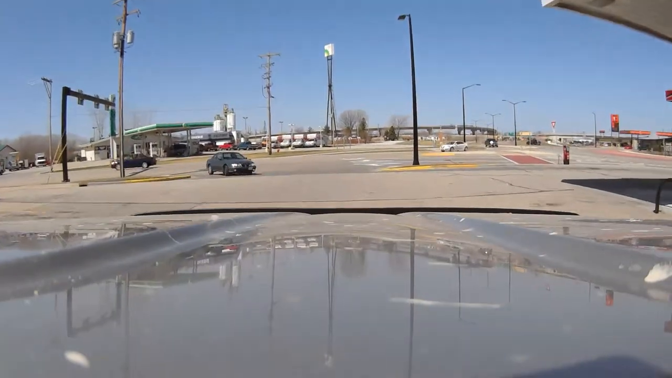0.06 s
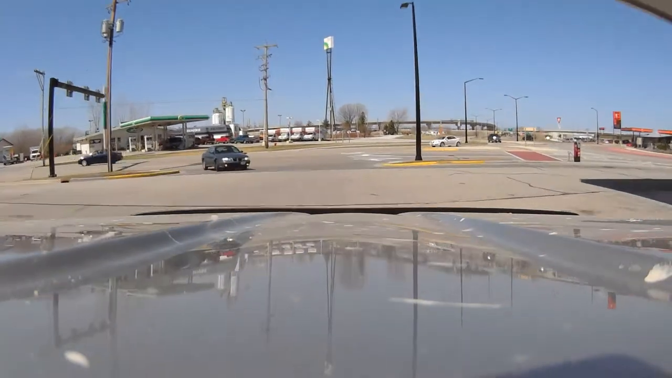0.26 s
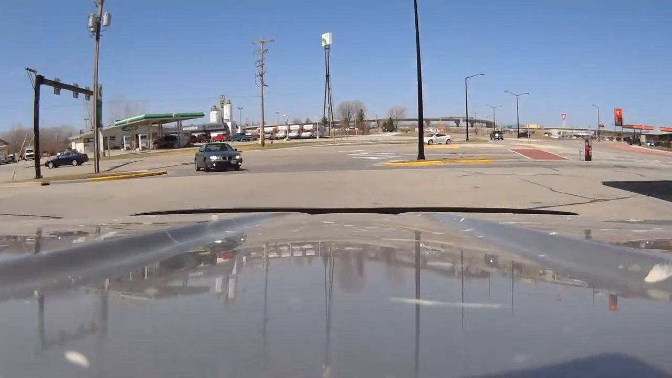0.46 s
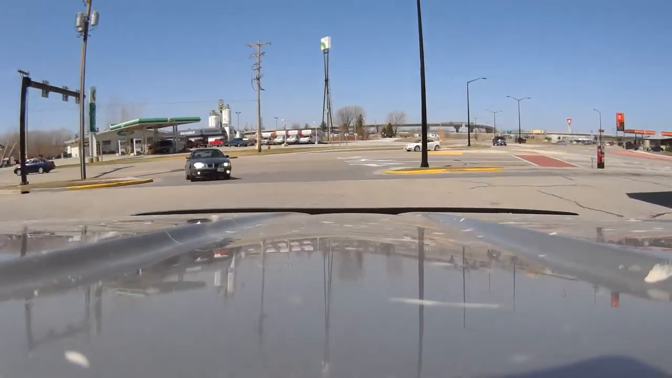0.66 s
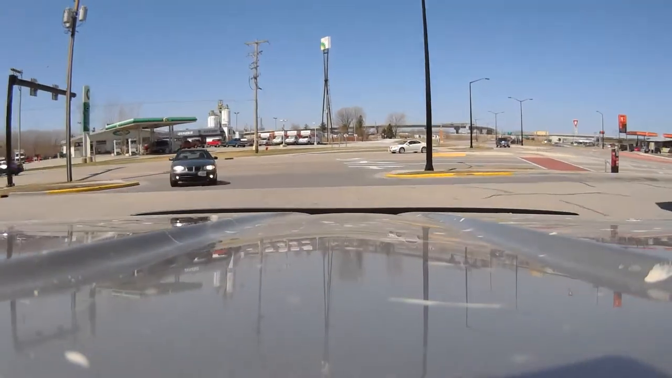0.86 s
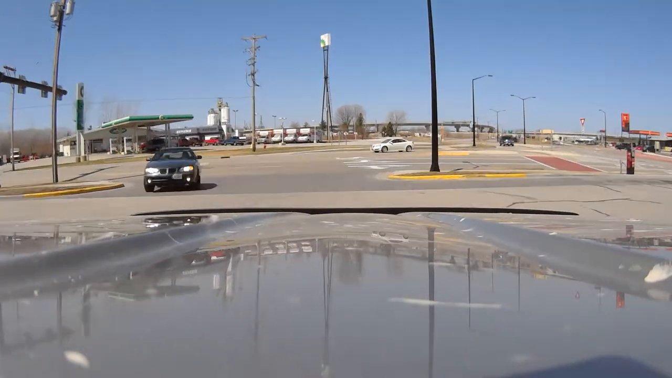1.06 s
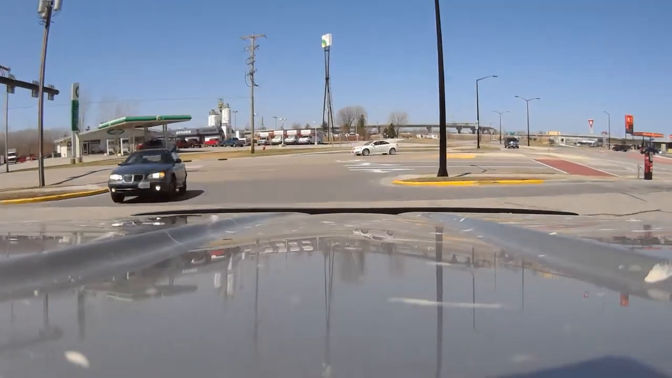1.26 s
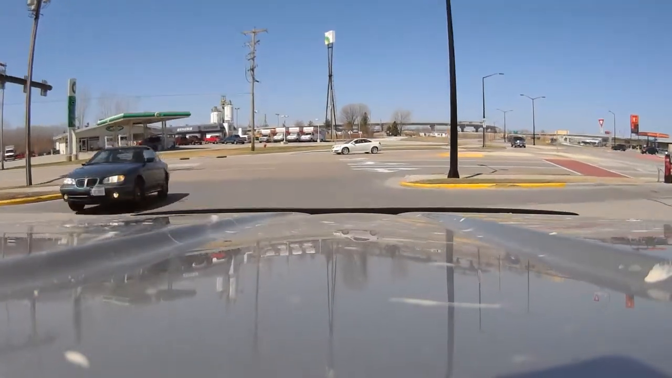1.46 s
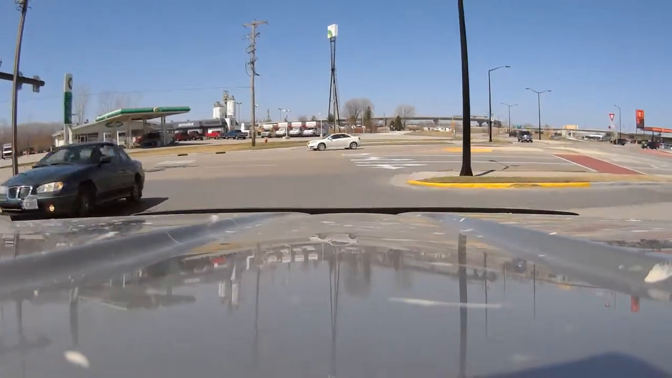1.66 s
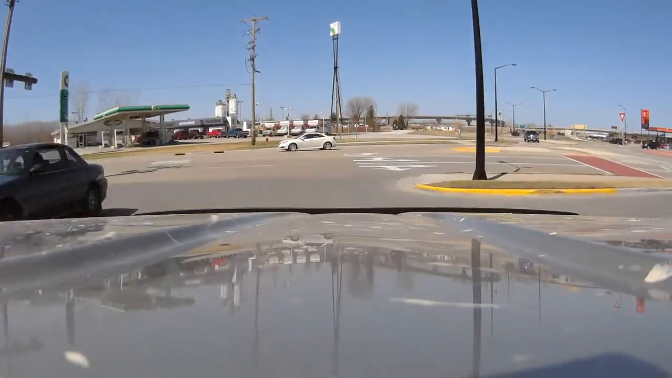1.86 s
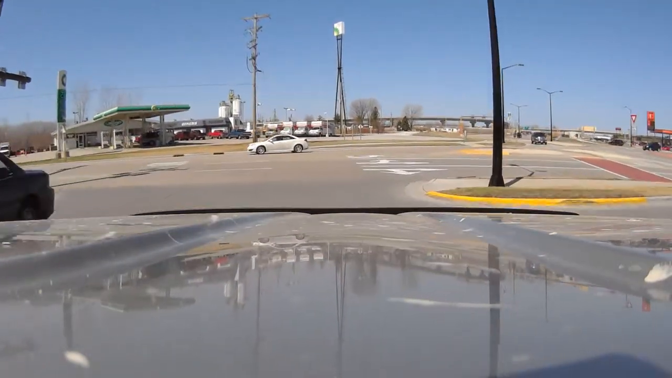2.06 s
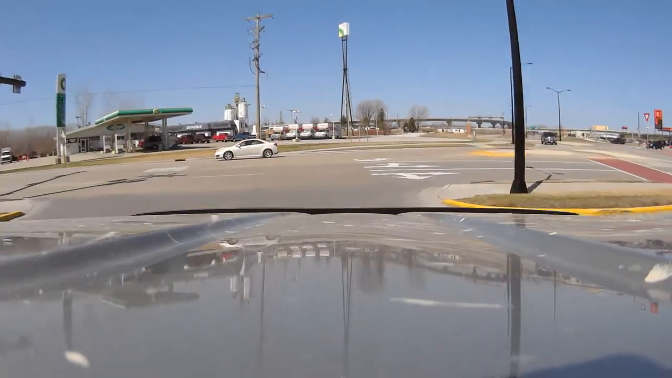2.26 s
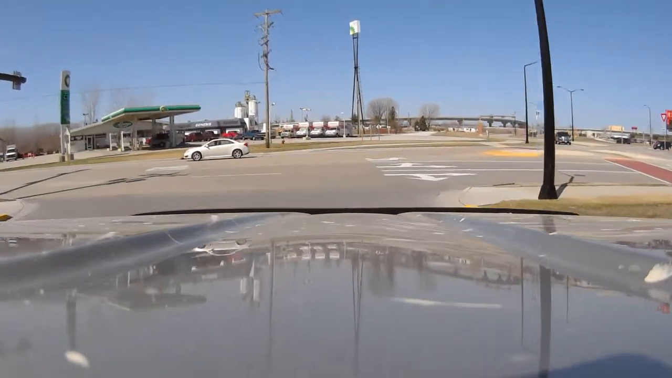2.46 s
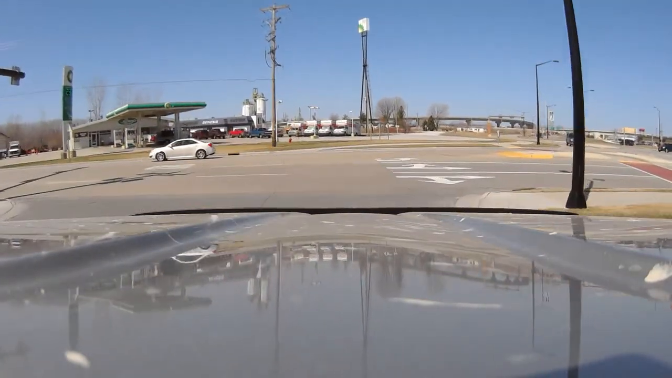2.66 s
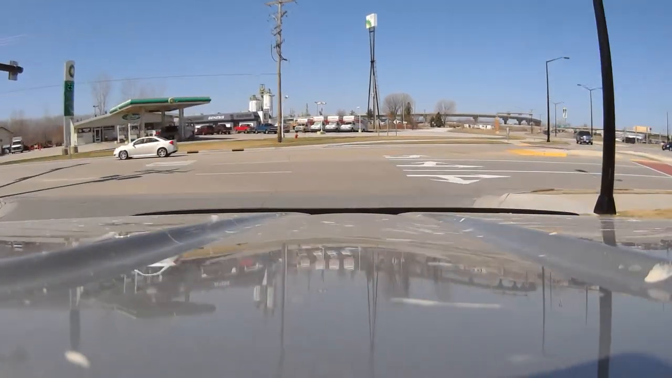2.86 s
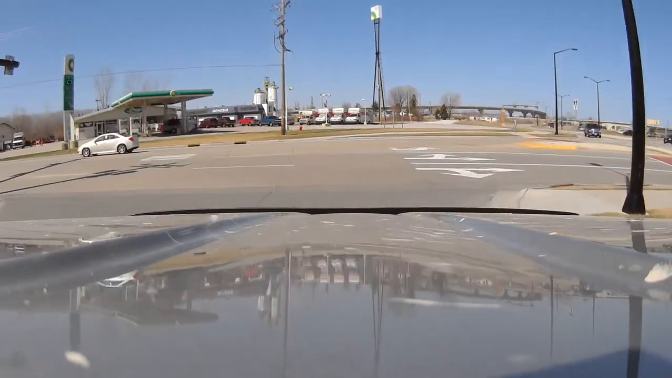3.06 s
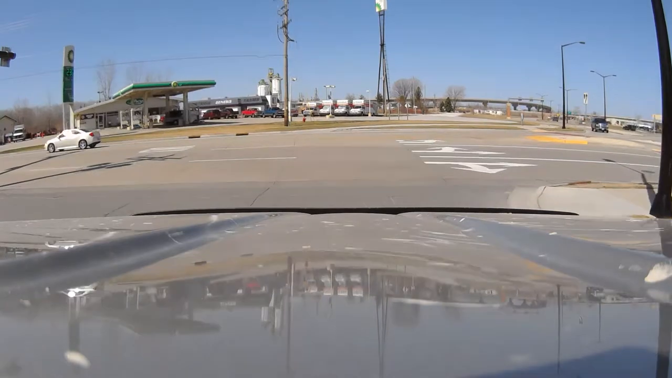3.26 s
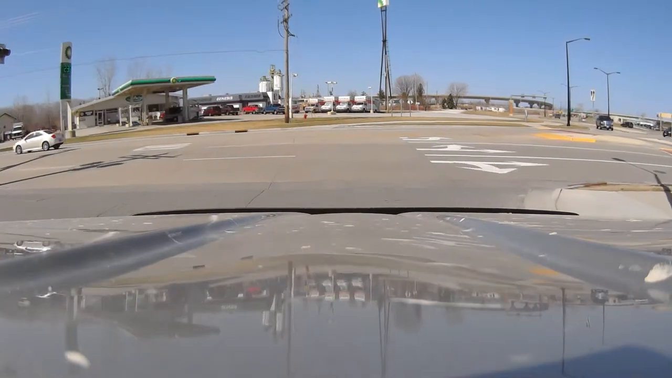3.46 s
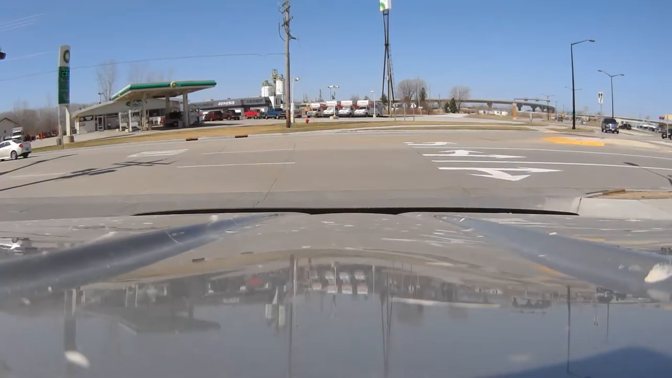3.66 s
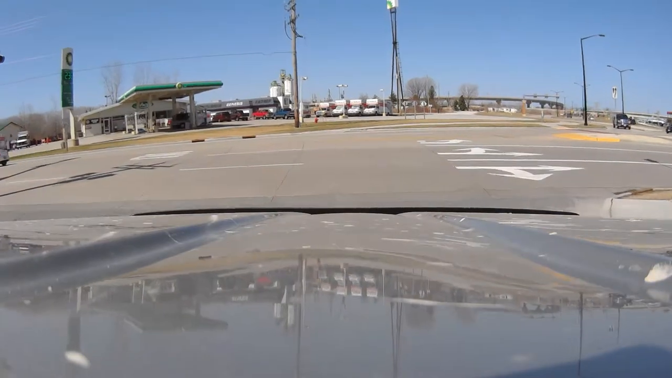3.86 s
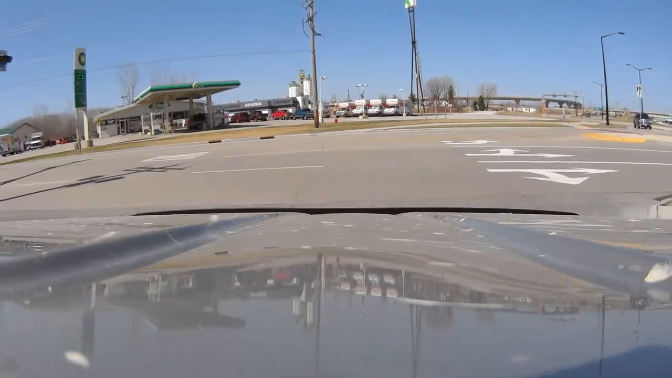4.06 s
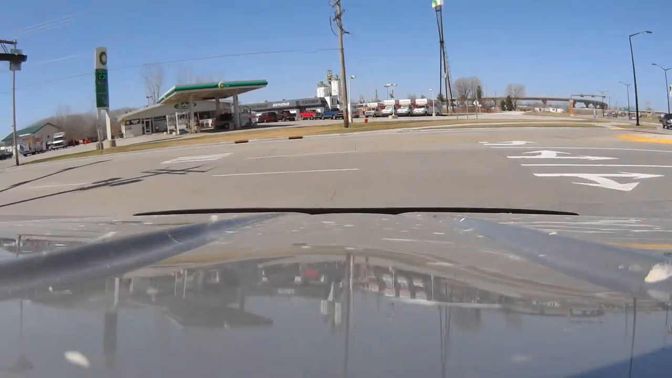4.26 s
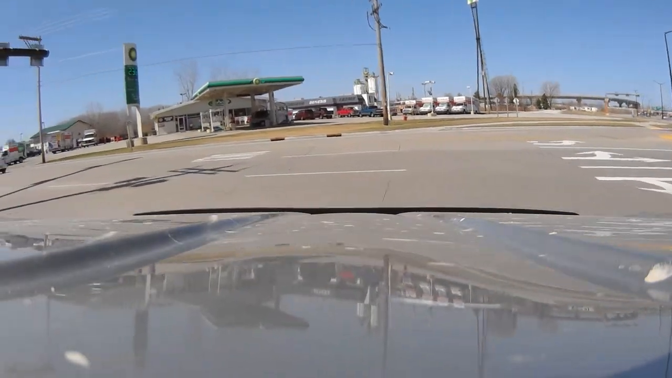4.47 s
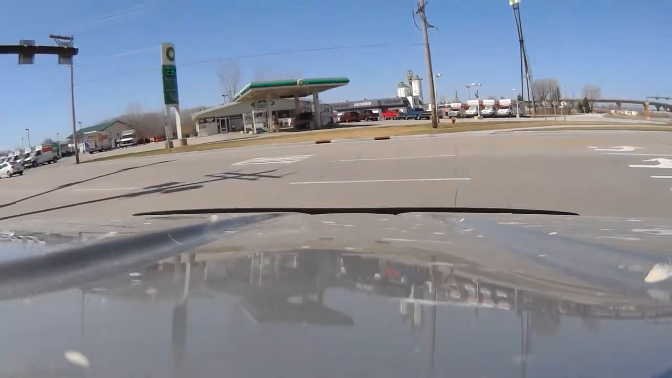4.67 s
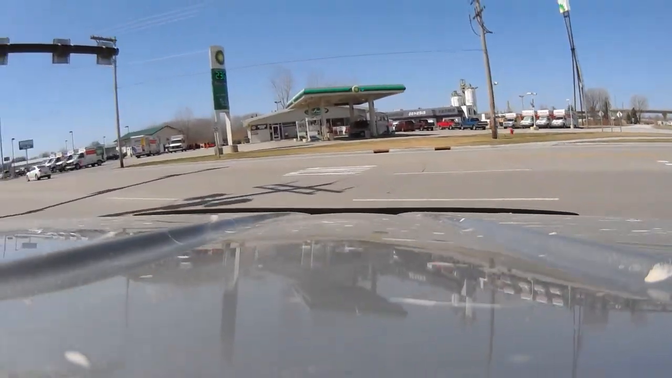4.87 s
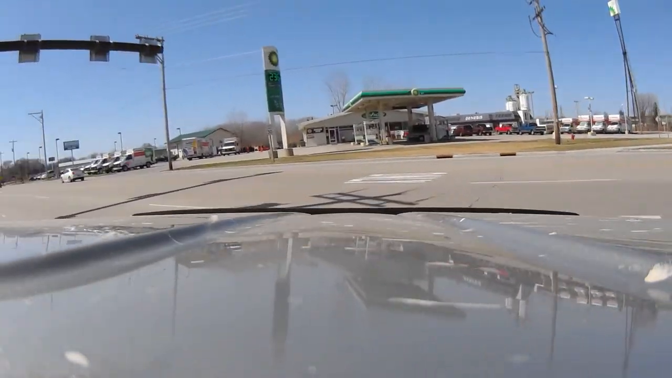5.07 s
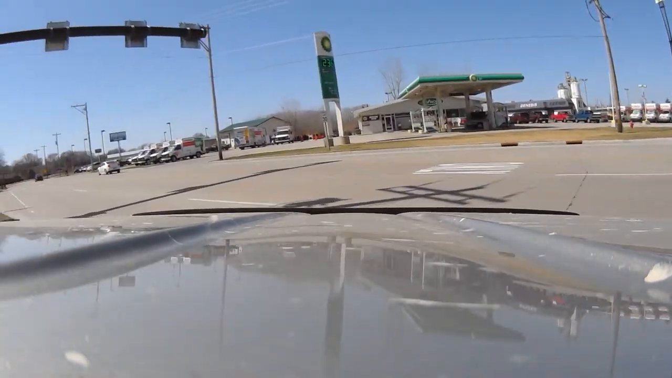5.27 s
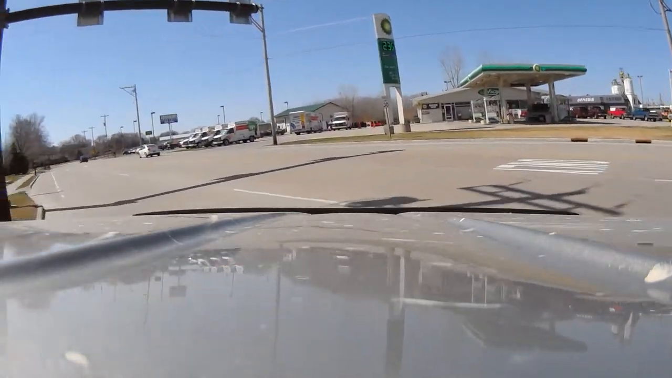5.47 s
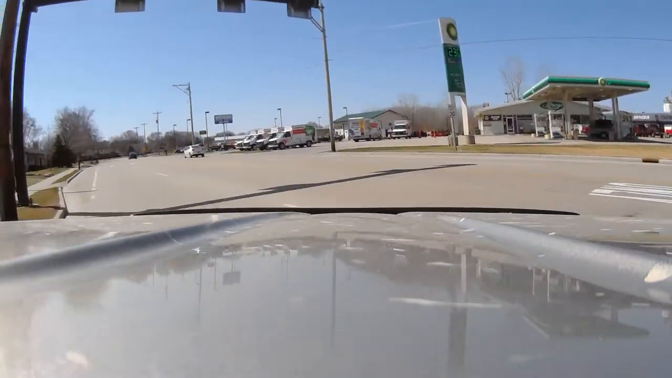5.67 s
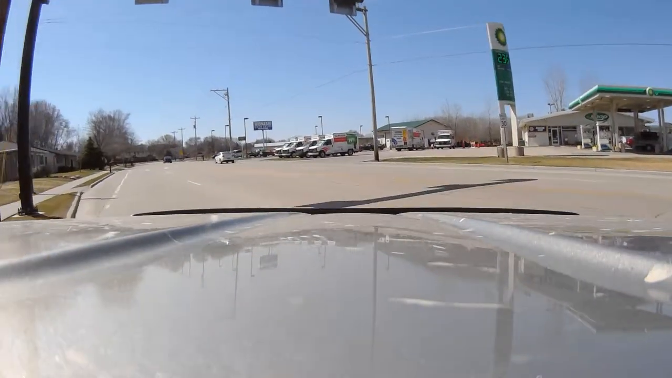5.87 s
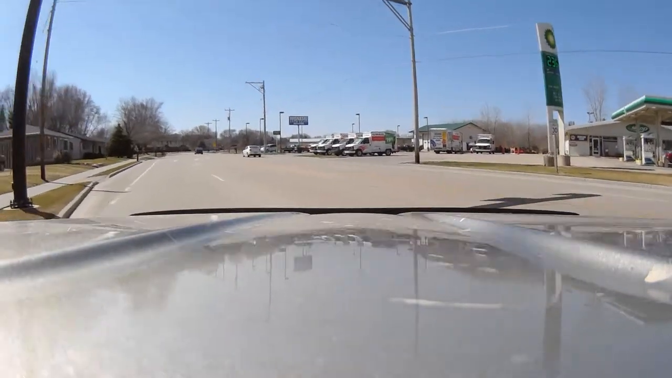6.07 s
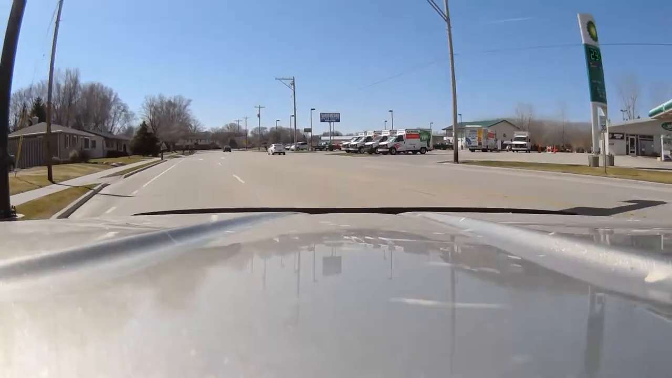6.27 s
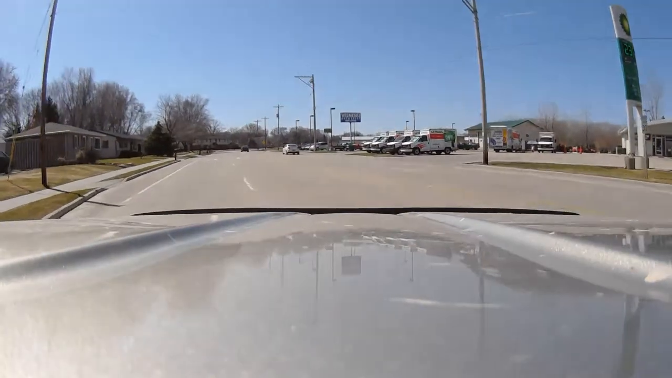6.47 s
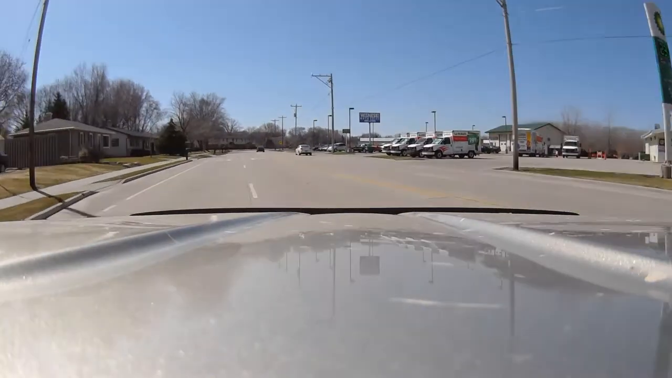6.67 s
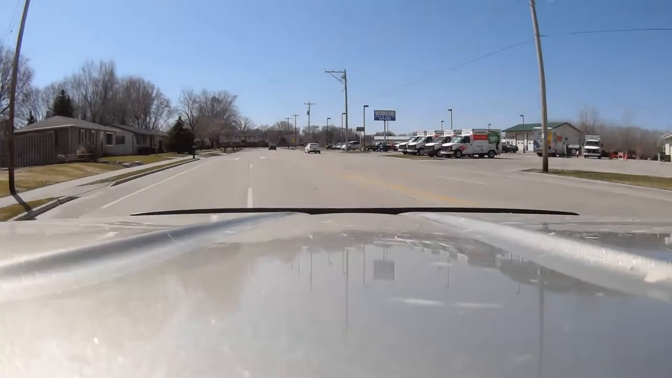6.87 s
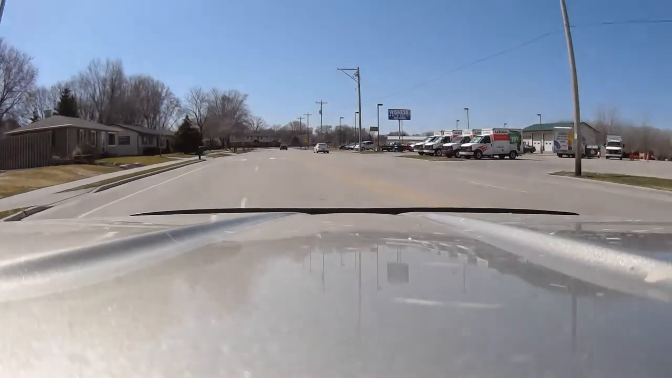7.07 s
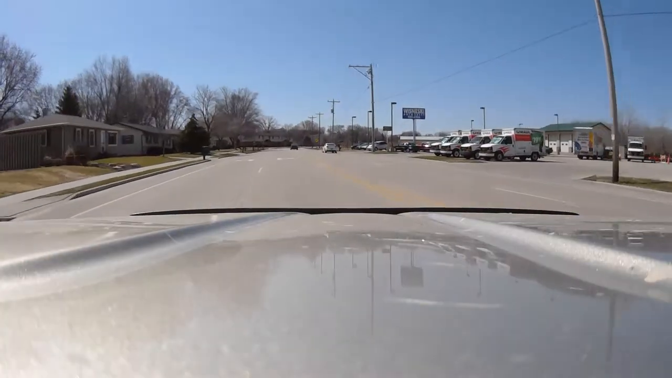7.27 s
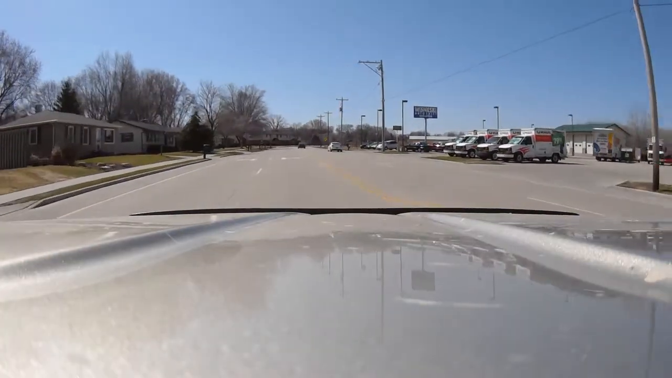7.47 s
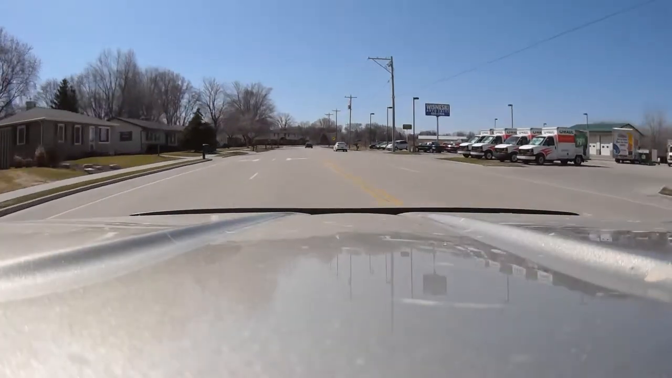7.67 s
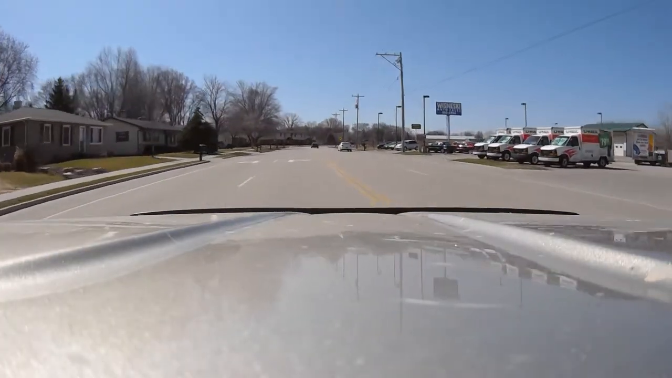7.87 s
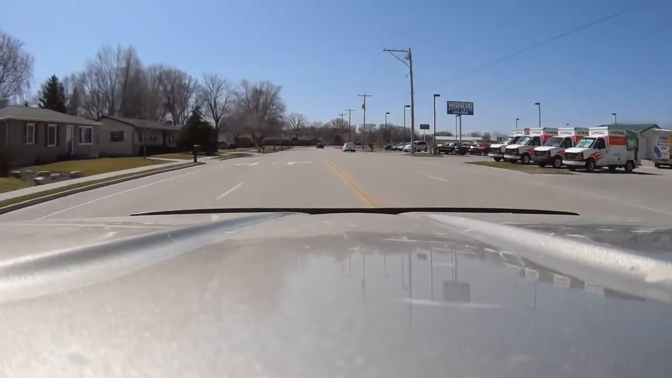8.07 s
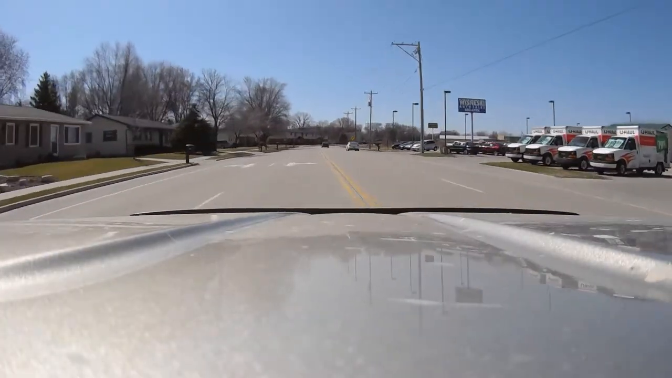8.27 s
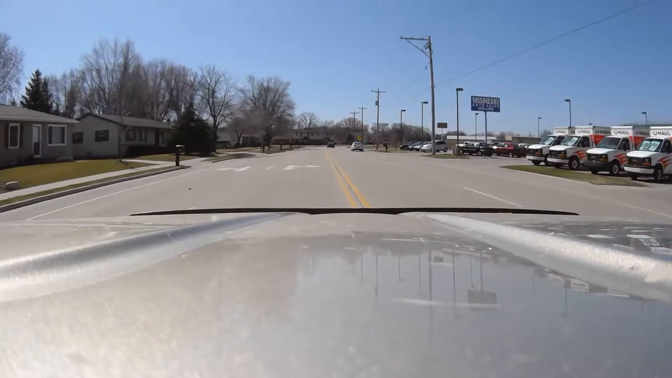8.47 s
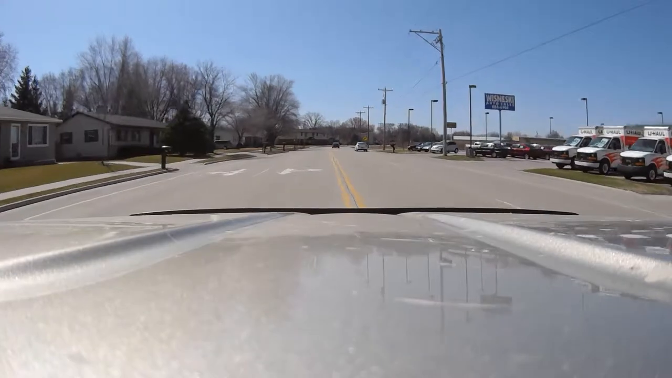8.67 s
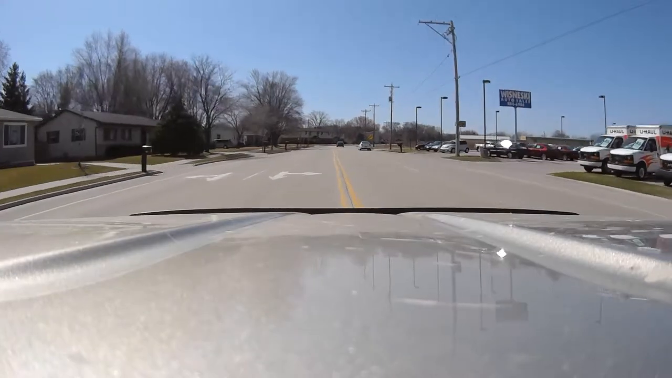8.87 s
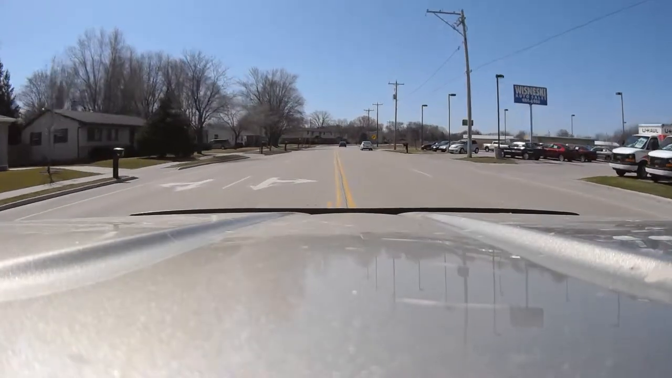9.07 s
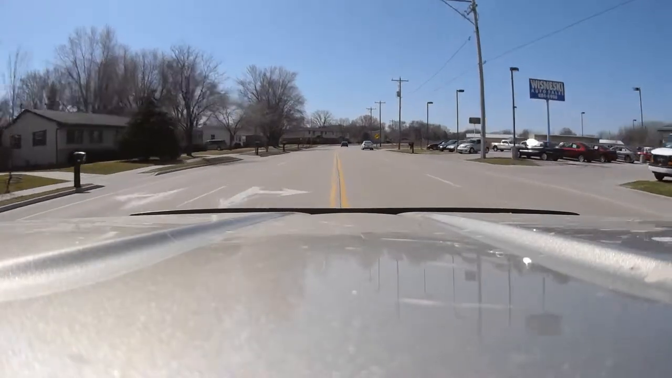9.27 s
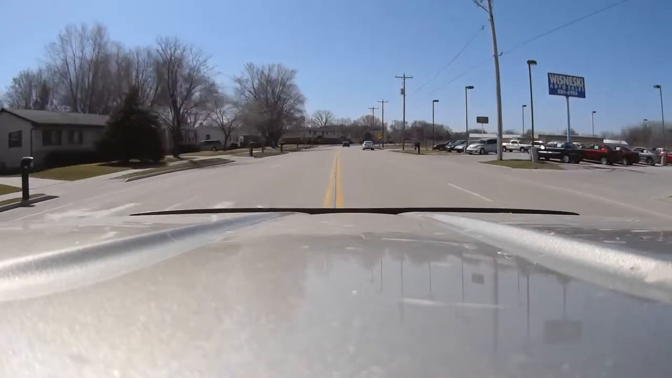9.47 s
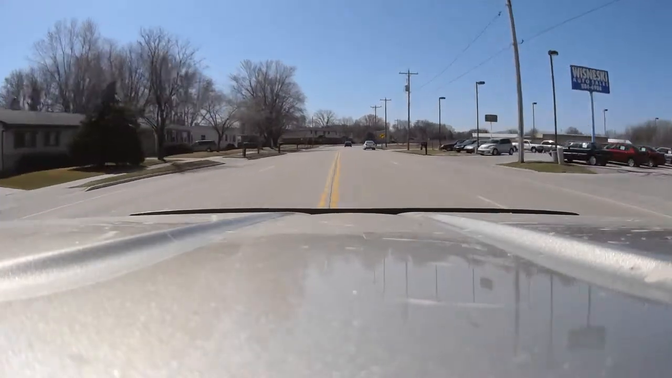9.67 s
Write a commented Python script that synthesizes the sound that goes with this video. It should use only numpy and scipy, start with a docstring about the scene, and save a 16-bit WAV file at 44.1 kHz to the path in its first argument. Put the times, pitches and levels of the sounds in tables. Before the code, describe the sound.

A car engine gives a brief blip and sinks toward idle as the car rolls slowly, with a few dull knocks from the pavement. Then the throttle opens and a booming engine note climbs steadily along the street, joined by low tyre roar. Wind grows on the bonnet-mounted microphone until its rumbling, thumping and crackling gusts dominate and briefly distort.

```python
"""A six-cylinder car, heard from its bonnet, coasts out of a forecourt and then pulls away hard.
Firing pulses sweep the exhaust resonances, booming as the throttle opens and the note climbs.
Tyres roar, the pavement knocks, an alternator whines and the intake whistles briefly.
With speed, wind buffets the microphone, tears into crackle and overloads the recorder."""
import sys
import numpy as np
from scipy import signal
from scipy.fft import rfft, irfft, next_fast_len
from scipy.io import wavfile
from scipy.ndimage import uniform_filter1d, map_coordinates

SR = 44100
rng = np.random.default_rng(int(sys.argv[2]) if len(sys.argv) > 2 else 0)


def output_pcm(signal):
    """Save a mono or channel-first signal as 16-bit PCM at the path in sys.argv[1].

    Samples are clipped to [-1, 1] before scaling.
    """
    pcm = np.clip(np.atleast_2d(signal).T, -1, 1) * 32767
    wavfile.write(sys.argv[1], SR, np.round(pcm).astype(np.int16))


N = 428211
T = np.arange(N) / SR

# midrange crackle of air tearing off the microphone: freq_hz, gain_db
CRACKLE_EQ = [(100, -27), (350, -16), (700, 5), (1400, -4), (2500, -17.5), (4500, -36.5), (8000, -34.5)]
# bright snap of the hardest tears: freq_hz, gain_db
SNAP_EQ = [(200, -18), (1200, 1), (3000, -4.5), (5000, -9), (8000, -20.5)]


def amp(db):
    """Decibels to gain."""
    return 10 ** (np.asarray(db) / 20)


def unit(x):
    """Scale to rms 1."""
    return x / np.sqrt(np.mean(x ** 2) + 1e-20)


def along(eq, hz):
    """Gain in dB of an EQ curve at hz, on a log frequency axis."""
    freq_hz, gain_db = np.transpose(eq)
    return np.interp(np.log(hz + 1), np.log(freq_hz + 1), gain_db)


def curves(rows):
    """Automation: one value per sample for each column after the time."""
    time_s, *columns = np.transpose(rows)
    return [np.interp(T, time_s, column) for column in columns]


def wobble(rate_hz):
    """Smooth random modulation of rms 1."""
    knots = rng.standard_normal(int(N * rate_hz / SR) + 4)
    return unit(map_coordinates(knots, [T * rate_hz]))


def filtered(x, response):
    """Filter x by a gain given as a function of frequency."""
    size = next_fast_len(N + 8192)
    return irfft(rfft(x, size) * response(np.fft.rfftfreq(size, 1 / SR)), size)[:N]


def noise(eq, envelope_db=0):
    """Noise shaped by an envelope, then an EQ curve, and scaled to rms 1."""
    white = rng.standard_normal(N) * amp(envelope_db)
    return unit(filtered(white, lambda hz: amp(along(eq, hz))))


def band(centre_hz, width_hz):
    """Noise of rms 1 in one resonance."""
    return unit(filtered(rng.standard_normal(N), lambda hz: 1 / (1 + ((hz - centre_hz) / width_hz) ** 2)))


def swell(hold_s, level_db, rise_db_per_s, fall_db_per_s):
    """Envelope in dB that fades in, holds over a span and fades out."""
    start, end = hold_s
    return level_db - rise_db_per_s * np.maximum(start - T, 0) - fall_db_per_s * np.maximum(T - end, 0)


def puffs(times_s, levels_db, life_s):
    """Gain envelope with a brief, symmetrical spike at each time."""
    peaks = np.zeros(N)
    peaks[np.round(times_s * SR).astype(int)] = amp(levels_db)
    age = np.arange(-SR // 20, SR // 20) / SR
    return signal.fftconvolve(peaks, np.exp(-np.abs(age) / life_s), "same")


def engine(sizzle_db=-69):
    """One firing rate drives the exhaust note, its growl, the alternator and the valve sizzle."""
    # the engine sinks to idle, then pulls up through one gear: time_s, firing_hz
    revs = [(0, 96), (.13, 87), (.4, 81), (1.4, 75), (1.9, 59), (2.8, 54.5), (3.2, 46.8), (3.55, 44.2),
            (3.81, 47), (4.02, 77.5), (4.18, 85.5), (4.6, 96), (5.5, 110.5), (6.7, 132.5), (8.05, 168.5),
            (9.71, 213)]
    # a blip, a coast, then the pedal goes down and stays there: time_s, throttle_db
    throttle = [(0, -4), (.055, -7.5), (.13, -27), (1.1, -22.5), (2.5, -33.5), (3.78, -14), (3.98, -0.5),
                (6.8, 0.5), (9.71, -1.5)]
    firing_hz, = curves(revs)
    throttle_db, = curves(throttle)
    firing_hz *= 1 + .002 * wobble(14)
    phase = 2 * np.pi * np.cumsum(firing_hz) / SR
    tones = firing_note(firing_hz, phase, throttle_db) + growl(firing_hz, phase) + alternator(phase)
    sizzle = unit(band(6500, 1200) * amp(3.7 * np.cos(phase)))  # valves and injectors
    return np.sqrt(2) * tones + amp(sizzle_db + throttle_db) * sizzle


def firing_note(firing_hz, phase, throttle_db, idle_db=-15.5, idle_hz=45, flutter_db=1.22):
    """Even firing sweeps three harmonics through the exhaust resonances; the second booms near idle."""
    # boom and upper resonances of exhaust and body: freq_hz, gain_db
    exhaust_eq = [(45, -26), (72, -16), (90, -13.5), (110, -19), (140, -24.5), (168, -25), (190, -33.5),
                  (205, -33.5), (222, -26.5), (258, -33), (298, -23), (320, -25), (346, -19), (385, -27),
                  (415, -24), (520, -40)]
    # overtone drive against the fundamental, opening up with revs: firing_hz, second_db, third_db
    overtones = [(60, -13, -20), (84, -7.5, -21), (106, -6.5, -23), (110, -1.5, -19.5), (119.5, -6, -9.5),
                 (140, -5, -10), (148, -3, -13), (213, -7.5, -12)]
    rates_hz, *overtone_db = np.transpose(overtones)
    second_db, third_db = [np.interp(firing_hz, rates_hz, db) for db in overtone_db]
    idle_boom = amp(idle_db - 17 * np.log2(firing_hz / idle_hz))  # fades 17 dB per octave
    drives = [amp(throttle_db), amp(throttle_db + second_db) + idle_boom, amp(throttle_db + third_db)]
    note = np.zeros(N)
    for harmonic, drive in enumerate(drives, 1):
        resonance = amp(along(exhaust_eq, harmonic * firing_hz) + flutter_db * wobble(45))
        note += drive * resonance * np.sin(harmonic * phase + rng.uniform(0, 2 * np.pi))
    return note


def growl(firing_hz, phase, uneven_db=4.5, falloff_db=6):
    """Differences between the six cylinders fill in the crank orders around the firing harmonics."""
    # what the exhaust passes of the uneven pulses: freq_hz, gain_db
    pipe_eq = [(20, -52), (50, -43.5), (90, -40.5), (150, -40.5), (220, -46.5), (290, -38.5), (350, -38),
               (430, -46.5), (620, -59.5), (1000, -51.5)]
    # growl of the unequal cylinders: time_s, gain_db
    growl_ride = [(0, -7), (1.5, -11), (3.7, -15), (4.1, -8), (5.5, -4), (6.5, 2), (8.8, -3), (9.4, 10.5),
                  (9.71, 6)]
    growl_db, = curves(growl_ride)
    out = np.zeros(N)
    for crank_order in (2, 4, 5, 7, 8, 10, 11, 12, 13):
        multiple = crank_order / 3  # three firings per turn
        db = along(pipe_eq, multiple * firing_hz) + growl_db + uneven_db * wobble(7)
        db -= falloff_db * max(multiple - 2.4, 0)  # blunt exhaust pulses carry few high orders
        out += amp(db) * np.sin(multiple * phase + .074 * wobble(25) + rng.uniform(0, 2 * np.pi))
    return out


def rolling(level_db=-33, resonance_db=-62):
    """A steady bed of tyre and fan noise with one narrow resonance."""
    # tyres, fan and traffic at walking pace: freq_hz, gain_db
    bed_eq = [(30, -10.5), (75, 1.5), (140, -2), (190, -16.5), (310, -7.5), (400, -15.5), (500, -14.5),
              (680, -31), (1150, -34), (1600, -42.5), (2500, -48), (5000, -58.5), (8000, -63)]
    return amp(level_db + .32 * wobble(5)) * noise(bed_eq) + amp(resonance_db) * band(960, 45)


def tyres(rough_db=3.5):
    """Tread on concrete: a low, slightly uneven roar."""
    # tyre roar, swelling through the turn: time_s, level_db
    roar_ride = [(0, -57.5), (3.7, -49), (4.2, -41.5), (4.7, -37), (5.25, -30.5), (5.7, -38.5), (6.3, -38),
                 (7.5, -37), (8.7, -29.5), (9.71, -33.5)]
    # dark tone of the tread: freq_hz, gain_db
    roar_eq = [(60, -17), (140, 1.5), (200, 1.5), (300, -4), (480, -5.5), (700, -12), (1100, -19),
               (1900, -30), (3000, -45), (8000, -66.5)]
    level_db, = curves(roar_ride)
    return amp(level_db + rough_db * wobble(90)) * noise(roar_eq)


def wind(gust_db=1.2, lurch_db=1.3, tear_db=7, spike_db=5, snap_onset_db=-20):
    """Slow pressure swings; in their troughs the flow tears off the microphone, crackles and snaps."""
    # wind layers growing with road speed, before their trims: time_s, buffet_db, flow_db, hiss_db
    wind_ride = [(0, -43.5, -74, -75.5), (1.6, -45.5, -75, -76), (1.77, -34, -66, -70),
                 (2.4, -41.5, -68, -74.5), (3.8, -39, -62.5, -74), (4.12, -38.5, -57, -64.5),
                 (5.0, -26, -40.5, -65.5), (5.45, -24, -38.5, -65.5), (5.9, -17.5, -38, -69.5),
                 (6.5, -20, -39, -64), (7.2, -24, -38.5, -61.5), (7.5, -17, -35.5, -60.5),
                 (8.4, -14, -33, -58), (9.1, -15.5, -33.5, -55), (9.7, -12, -28, -51.5)]
    # bass of the pressure swings: freq_hz, gain_db
    buffet_eq = [(10, -17.5), (20, 0), (32, 0.5), (56, -3), (90, -7.5), (125, -9), (180, -15), (280, -20),
                 (450, -29.5), (800, -50), (2000, -76.5)]
    # midrange rush of turbulent air: freq_hz, gain_db
    rush_eq = [(60, -26.5), (200, -1), (350, -4), (550, 3), (1000, -6.5), (1600, -15), (2500, -26),
               (4500, -37), (8000, -46)]
    # airy top of the wind: freq_hz, gain_db
    hiss_eq = [(300, -18.5), (1500, 0), (3000, 11.5), (5000, 8.5), (8000, -5.5)]
    buffet_db, steady_db, hiss_db = curves(wind_ride)
    flow_db = turbulence(steady_db)
    gust = wobble(30)
    pressure = noise(buffet_eq)
    surge_db = flow_db - uniform_filter1d(flow_db, size=SR // 3)  # quick gusts also push the bass
    lurching = unit(pressure * amp(1.4 * gust + lurch_db * wobble(8)))
    buffet = amp(buffet_db + 3 + .35 * surge_db) * lurching
    suction = np.clip(-pressure, -1.5, 1.5)
    rush = amp(-2) * noise(rush_eq, gust_db * gust + 7.7 * suction)
    tearing_db = gust_db * gust + tear_db * suction + spike_db * np.clip(wobble(700), -2.2, 2.2)
    crackle = amp(-7) * noise(CRACKLE_EQ, tearing_db)
    snap_gate = 1 / (1 + amp(2 * (snap_onset_db - buffet_db)))  # opens in strong wind
    snaps = snap_gate * amp(-18) * noise(SNAP_EQ, 2 * tearing_db)
    hiss = amp(hiss_db - 2 + .5 * gust) * noise(hiss_eq)
    return buffet + amp(flow_db) * (rush + crackle + snaps) + hiss


def turbulence(steady_db, trim_db=-1, restless_db=.93, edge_s=.0061):
    """Airflow level in dB: it wanders at random, and each gust rises, holds and falls on top."""
    # gusts that stand out of the flow: start_s, length_s, level_db
    gusts = [(4.428, 0.055, -40), (4.976, 0.034, -38.5), (5.182, 0.045, -33), (5.693, 0.022, -37),
             (5.792, .02, -30.5), (5.878, .06, -36.5), (6.073, 0.037, -33), (6.149, 0.041, -34),
             (6.307, 0.027, -33), (6.658, 0.022, -36), (6.895, 0.027, -32), (7.218, .035, -37.5),
             (7.379, 0.056, -23.5), (7.488, 0.021, -28), (7.593, 0.16, -33.5), (7.905, 0.12, -32.5),
             (8.037, 0.063, -30.5), (8.284, 0.095, -27), (8.445, 0.089, -25), (8.554, 0.065, -29),
             (8.795, 0.076, -23), (8.965, 0.029, -23), (9.064, 0.024, -25), (9.32, 0.25, -29),
             (9.62, 0.039, -23)]
    power = amp(steady_db + restless_db * wobble(22)) ** 2
    for start_s, length_s, level_db in gusts:
        outside_s = np.maximum(np.abs(T - start_s - length_s / 2) - length_s / 2 + edge_s / 2, 0)
        power += (amp(level_db + trim_db) / (1 + (outside_s / edge_s) ** 2)) ** 2
    return 10 * np.log10(power)


def knocks(loose_db=6):
    """Dull bumps over the pavement; some have a hard edge, and loose parts chatter around them."""
    # bumps at a slow roll, the edge relative to the level: time_s, level_db, edge_db
    bumps = [(1.585, -32.5, -36), (1.611, -41, -27), (1.907, -32, -20), (3.026, -41, -25),
             (3.059, -31.5, -26), (3.091, -40, -7.5), (3.107, -30.5, -30), (3.193, -27.5, -26),
             (3.24, -30, -33), (3.277, -37, -30), (3.289, -30.5, -31), (3.36, -32, -33)]
    # dead, boxy tone of a bump: freq_hz, gain_db
    knock_eq = [(100, -21), (300, 12.5), (600, 6.5), (1200, -3), (1700, -23.5), (3000, -36), (8000, -39.5)]
    time_s, level_db, edge_db = np.transpose(bumps)
    thud = puffs(time_s + .0011, level_db - 1, life_s=.0047) * noise(knock_eq)
    chatter = unit(noise(knock_eq) * amp(loose_db * wobble(120)))
    rattle = puffs(time_s, level_db - 17, life_s=.023) * chatter
    clack = puffs(time_s + .0013, level_db + edge_db + 6, life_s=.0017) * band(1560, 500)
    return thud + rattle + clack


def drones(attack_s=.013):
    """Two hollow tones ring and die away as the car rolls out."""
    # short, slightly wavering drones: start_s, level_db, pitch_hz, t60_s
    rings = [(1.911, -31.5, 311.4, 1.8), (2.638, -30, 337, .8)]
    out = np.zeros(N)
    for start_s, level_db, pitch_hz, t60_s in rings:
        age = np.maximum(T - start_s, 0)
        envelope = amp(level_db - 60 * age / t60_s) * (1 - np.exp(-age / attack_s))
        out += envelope * np.sin(2 * np.pi * pitch_hz * age + .19 * wobble(36))
    return out


def alternator(phase, cycles_per_firing=34.9):
    """The belt-driven alternator tracks the revs; its thin whine surfaces near idle."""
    level_db = swell(hold_s=(3.28, 3.69), level_db=-63.5, rise_db_per_s=33, fall_db_per_s=201)
    return amp(level_db + 2.9 * wobble(24)) * np.sin(cycles_per_firing * phase + .9 * wobble(80))


def intake(pitch_hz=4020, width_hz=140):
    """A breathy whistle as the throttle cracks open."""
    level_db = swell(hold_s=(4.0, 4.12), level_db=-72.5, rise_db_per_s=29, fall_db_per_s=35.5)
    return amp(level_db) * band(pitch_hz, width_hz)


def eddy_bursts(dip_s=.0035, flap_s=.0041, pop_s=.001, snap_s=.00004):
    """Each bursting eddy is a pressure dip and a thump, with a pop and a snap inside a flap of noise."""
    # eddies hitting the microphone, before each layer's trim: time_s, level_db, snap_db
    eddies = [(5.229, -25, -49), (5.416, -24.5, -57), (5.712, -19, -51), (5.879, -22, -61),
              (5.945, -20, -45), (6.181, -18.5, -54), (6.224, -25.5, -54), (6.279, -23, -52),
              (6.368, -20.5, -56), (6.398, -22.5, -60.5), (6.578, -29, -52), (6.664, -19, -55),
              (6.708, -26, -58), (6.753, -17, -47), (6.846, -21.5, -43), (7.092, -19.5, -47),
              (7.385, -13, -43), (7.411, -21, -41), (7.488, -14.5, -41), (7.773, -19, -58),
              (7.911, -15.5, -40.5), (7.965, -16.5, -46), (7.986, -18, -48), (8.151, -21, -58),
              (8.274, -17, -55), (8.326, -19, -38), (8.485, -11, -42), (8.623, -14, -49), (8.709, -20, -51),
              (8.825, -8.5, -32.5), (8.864, -12.5, -42), (8.976, -14.5, -53), (9.077, -11.5, -47),
              (9.388, -19.5, -35), (9.516, -13, -33.5), (9.624, -11.5, -46)]
    time_s, level_db, snap_db = np.transpose(eddies)
    time_s = time_s + .00168
    dip = puffs(time_s, level_db + 4, dip_s)
    thump = puffs(time_s, level_db - 5, flap_s) * band(310, 170)
    pop = puffs(time_s, level_db - 4, pop_s)
    flap = puffs(time_s, level_db - 16, flap_s)
    snap = filtered(puffs(time_s, snap_db + 31, snap_s), lambda hz: amp(along(SNAP_EQ, hz)))
    return thump - dip + (pop + flap) * noise(CRACKLE_EQ) + snap


def edge_tone(pitch_hz=2520, width_hz=40):
    """Air over an edge gives a thin, breathy whistle at speed."""
    level_db = swell(hold_s=(9.15, 9.65), level_db=-55.5, rise_db_per_s=92, fall_db_per_s=38)
    return amp(level_db) * band(pitch_hz, width_hz)


def scene():
    """Car and wind meet at one microphone on the bonnet."""
    car = engine() + intake() + rolling() + drones() + tyres() + knocks()
    return (car + wind() + eddy_bursts() + edge_tone())[None]


def record(dry, ceiling=.51, top_hz=8250):
    """The recorder clips flat on the strongest gusts and cuts the treble off steeply."""
    clipped = np.clip(dry[0], -ceiling, ceiling)
    return filtered(clipped, lambda hz: 1 / np.sqrt(1 + (hz / top_hz) ** 80))[None]


dry = scene()
out = record(dry)
output_pcm(out)
```